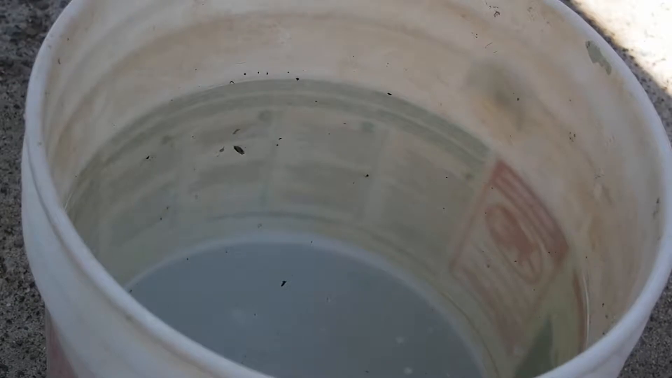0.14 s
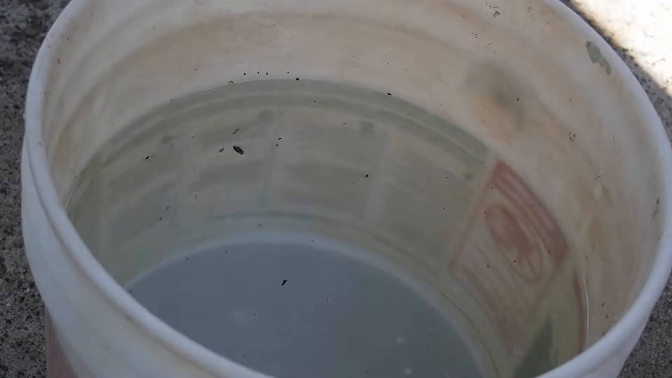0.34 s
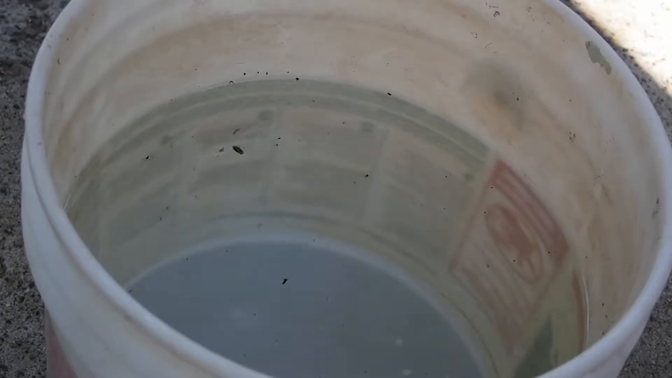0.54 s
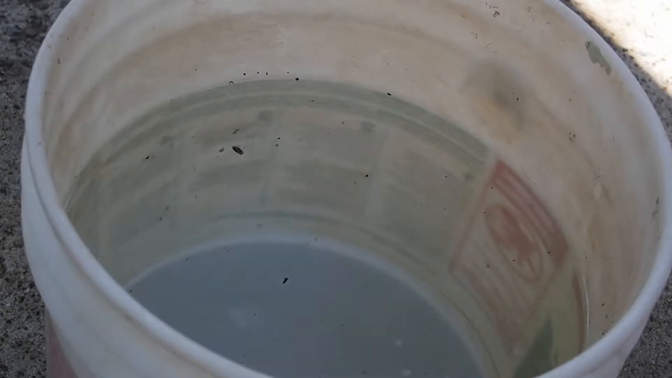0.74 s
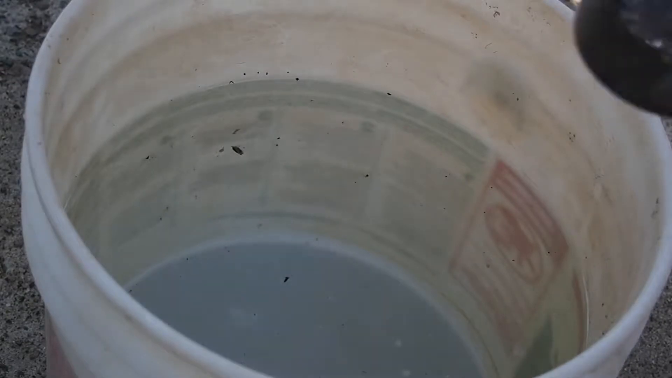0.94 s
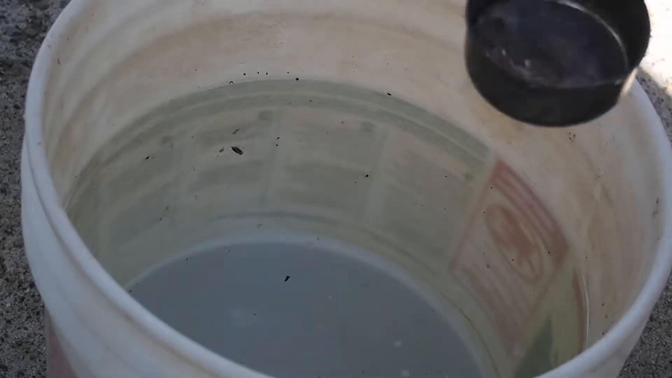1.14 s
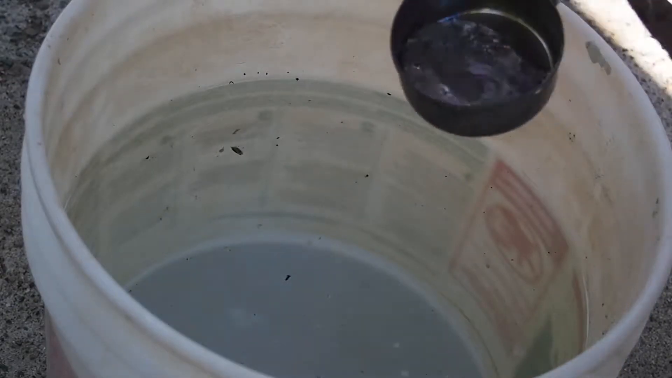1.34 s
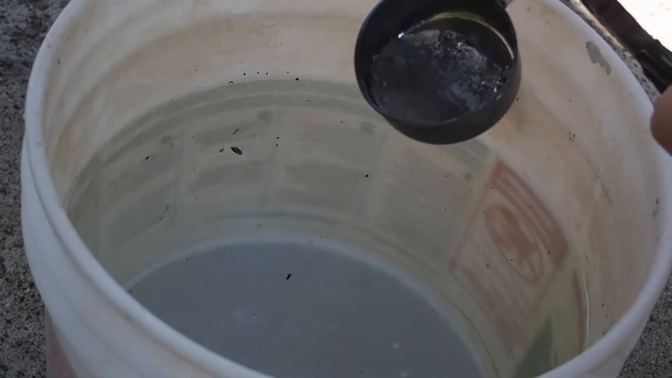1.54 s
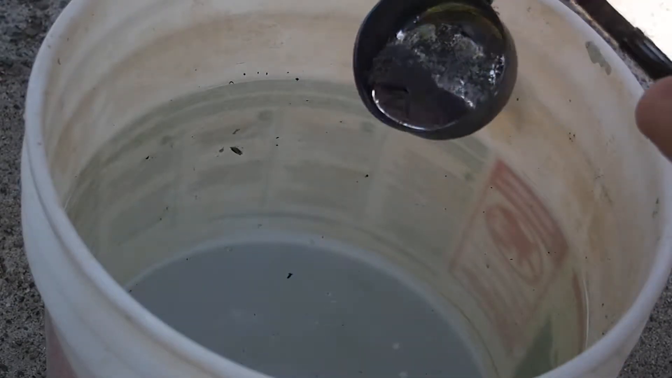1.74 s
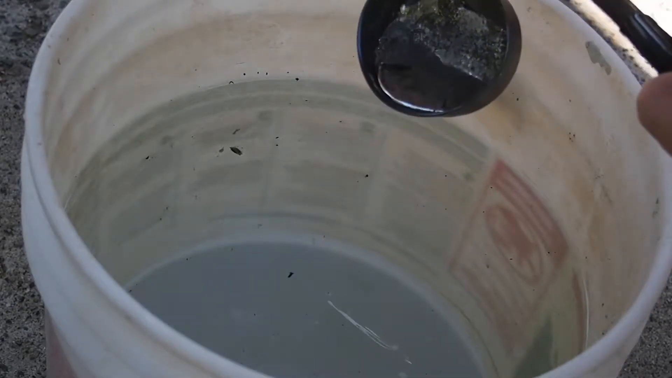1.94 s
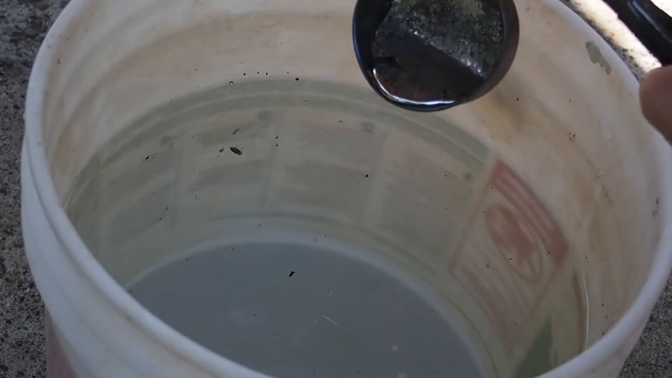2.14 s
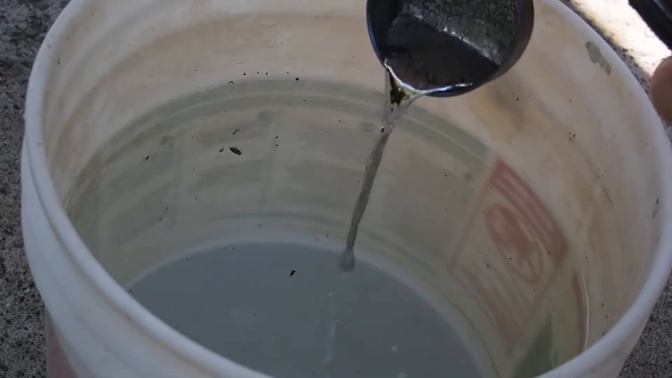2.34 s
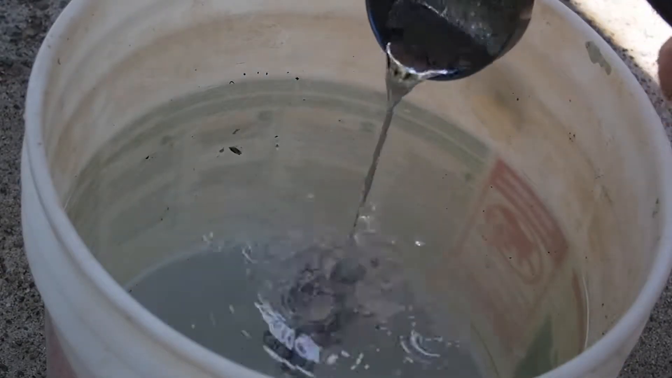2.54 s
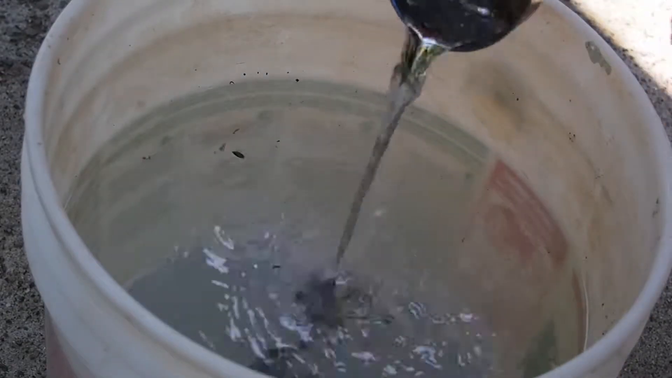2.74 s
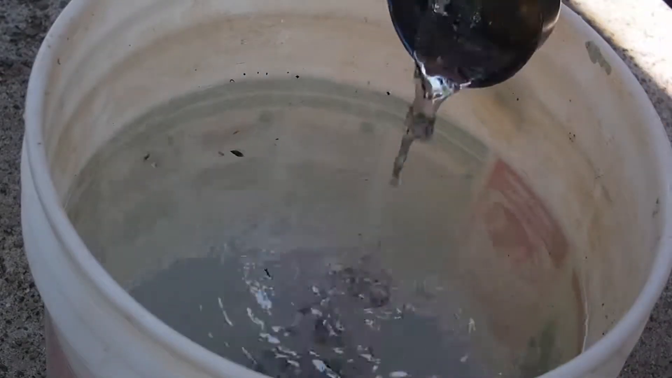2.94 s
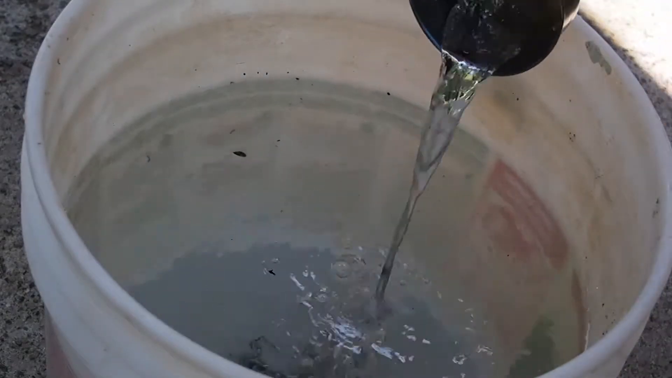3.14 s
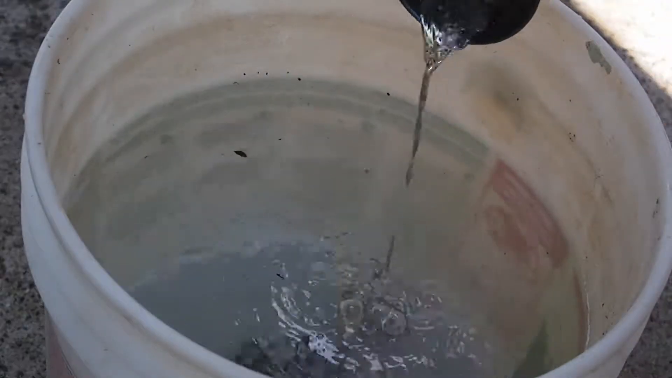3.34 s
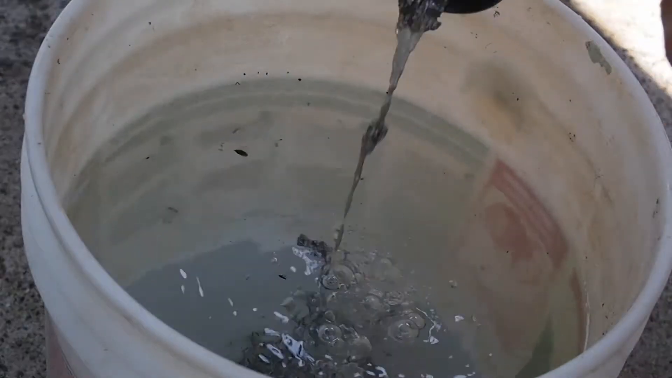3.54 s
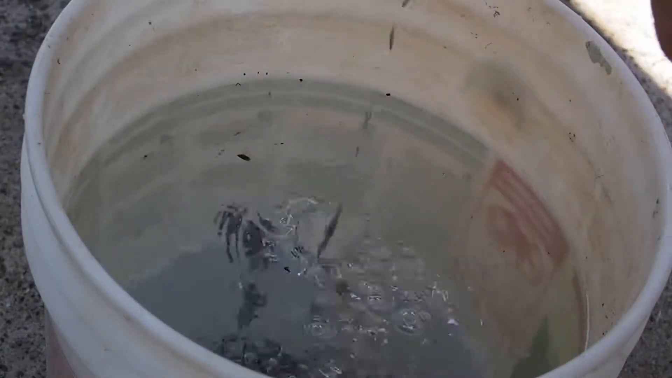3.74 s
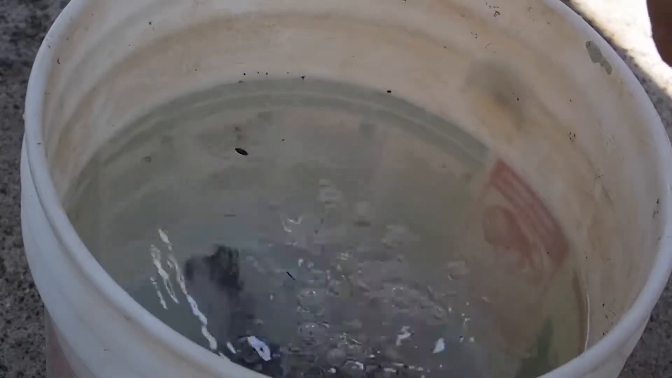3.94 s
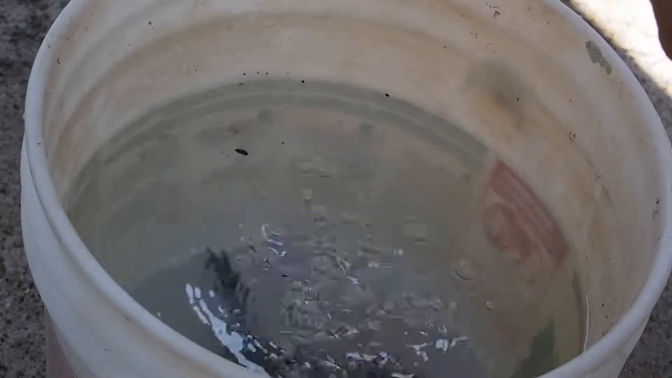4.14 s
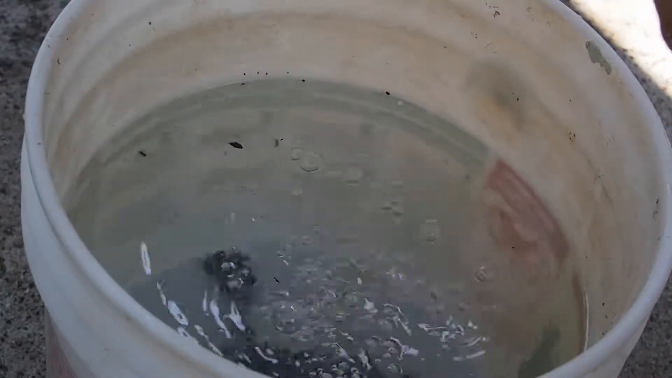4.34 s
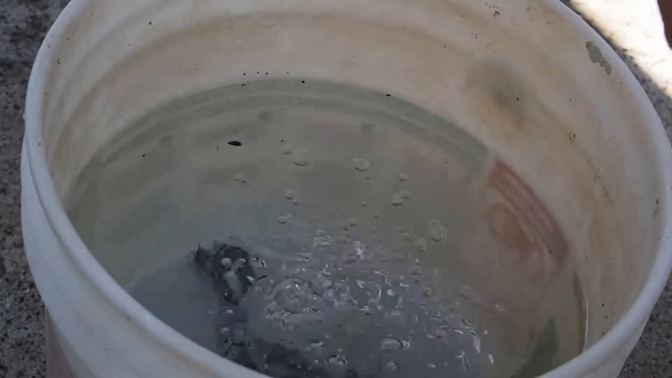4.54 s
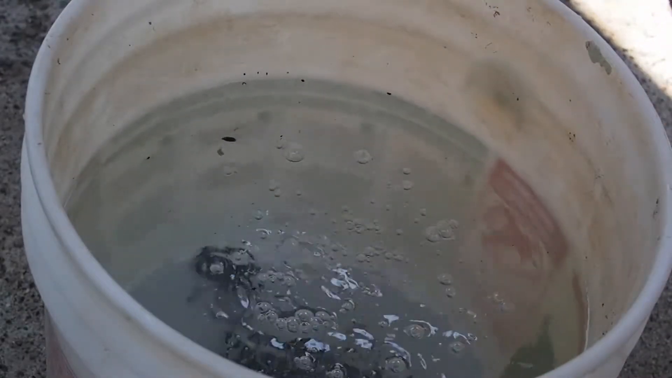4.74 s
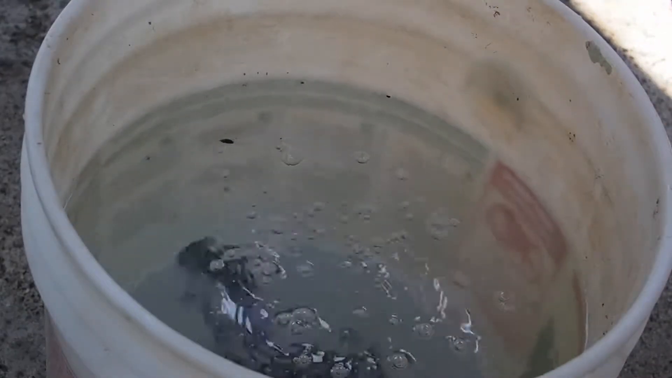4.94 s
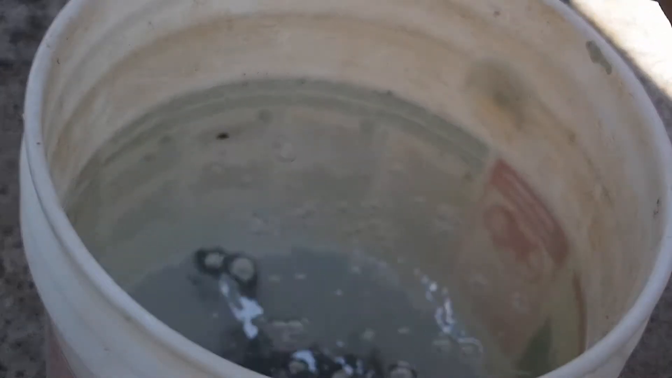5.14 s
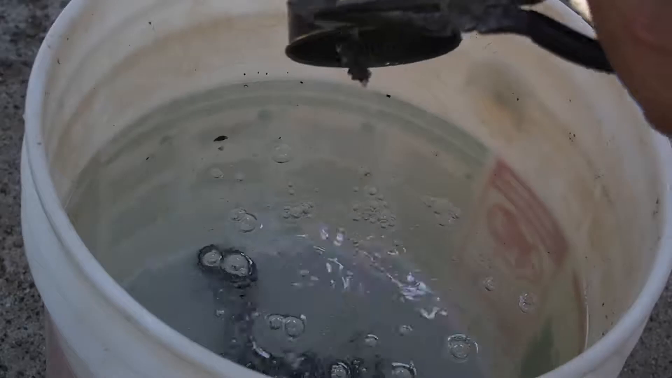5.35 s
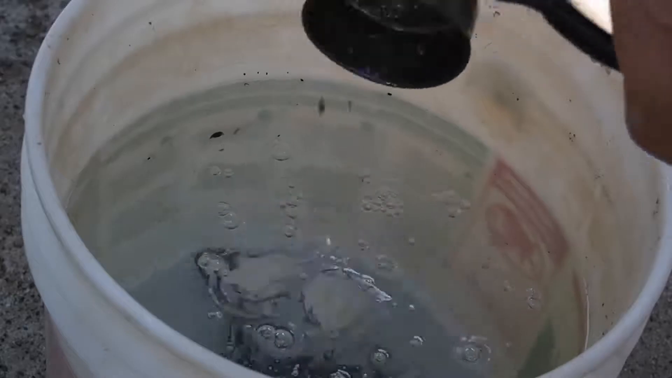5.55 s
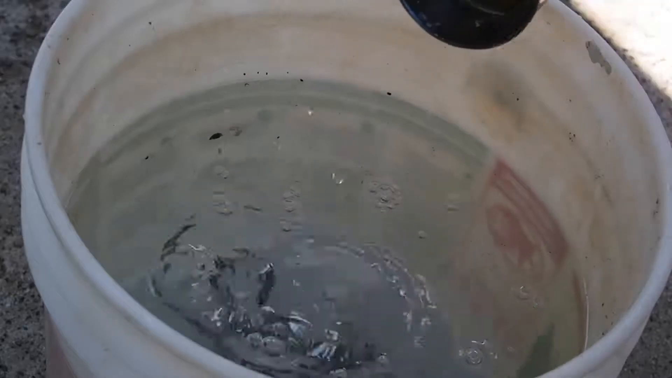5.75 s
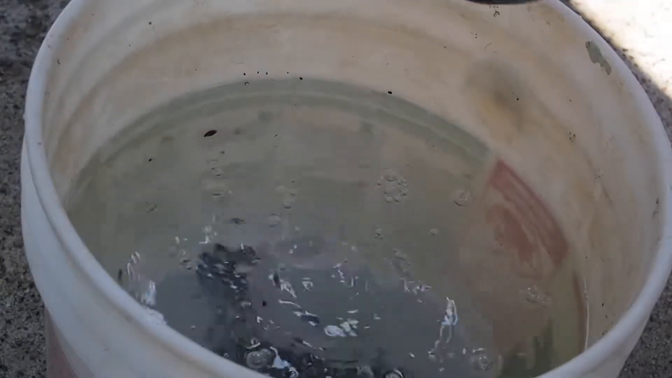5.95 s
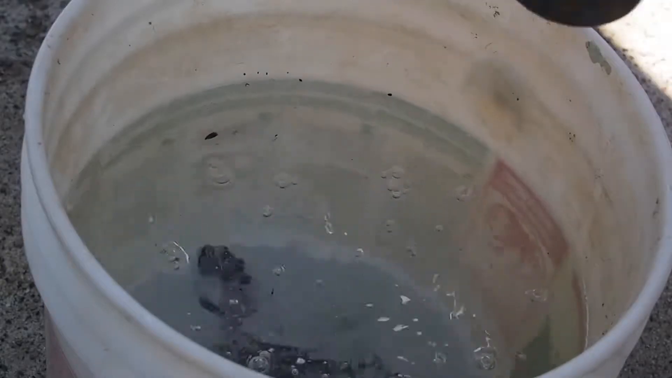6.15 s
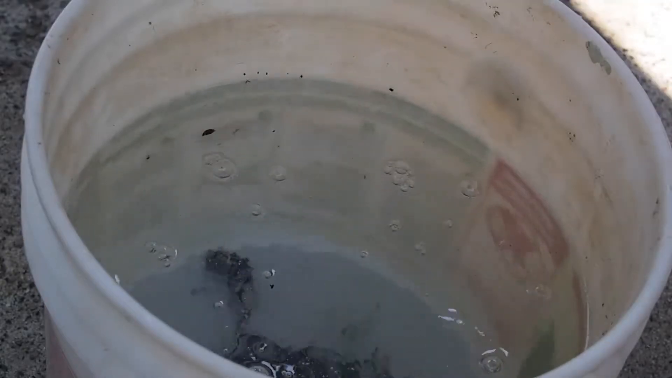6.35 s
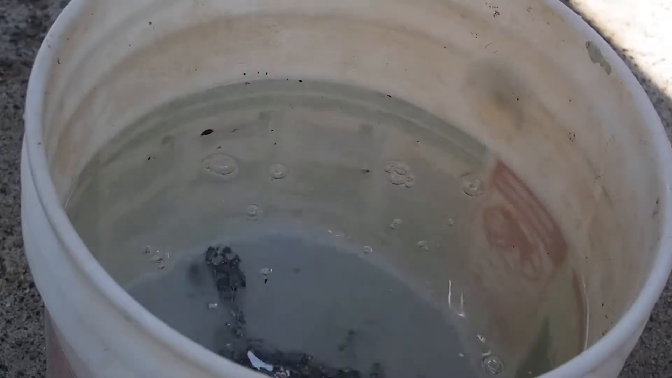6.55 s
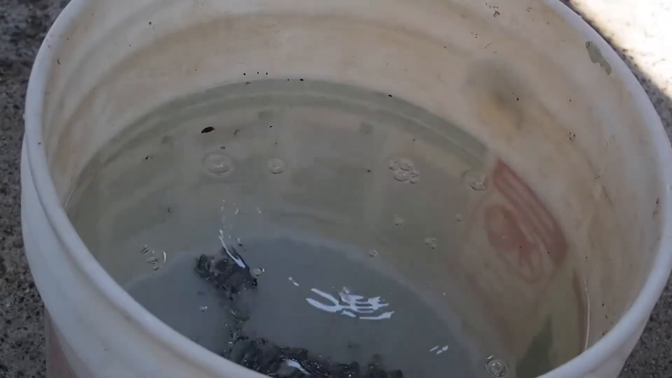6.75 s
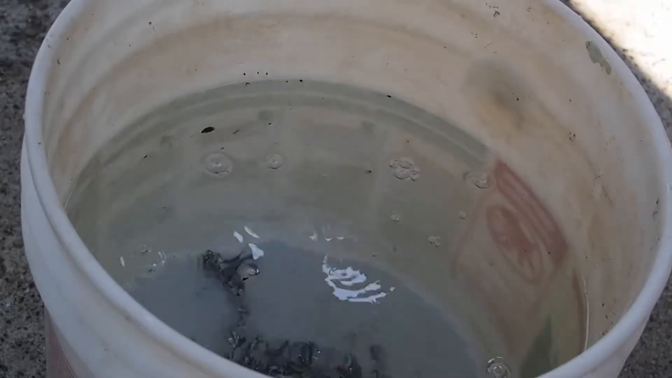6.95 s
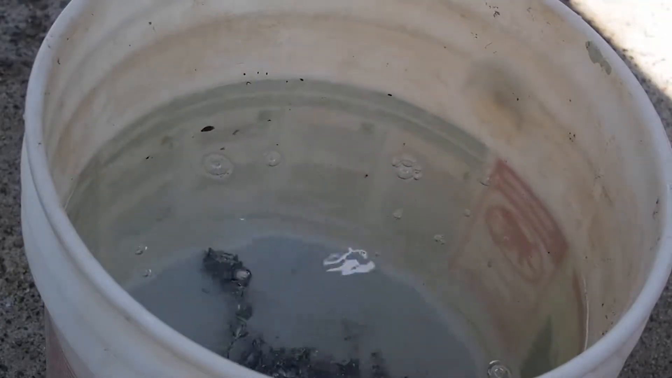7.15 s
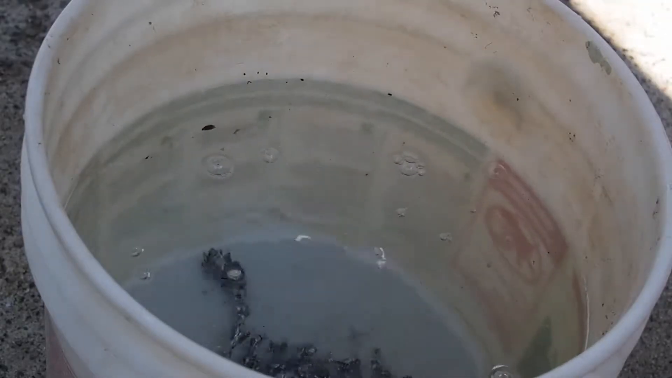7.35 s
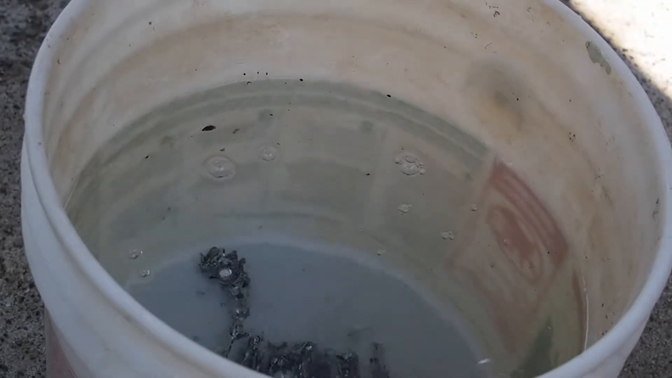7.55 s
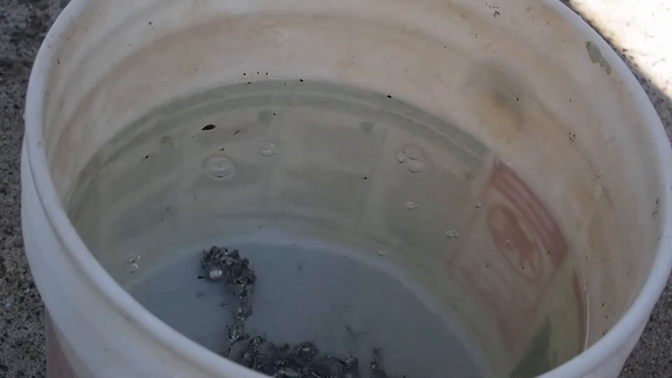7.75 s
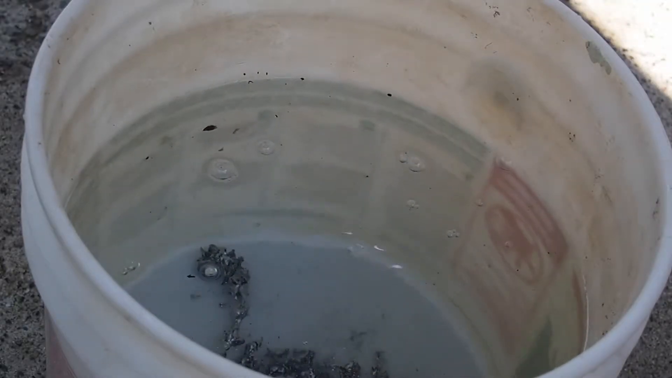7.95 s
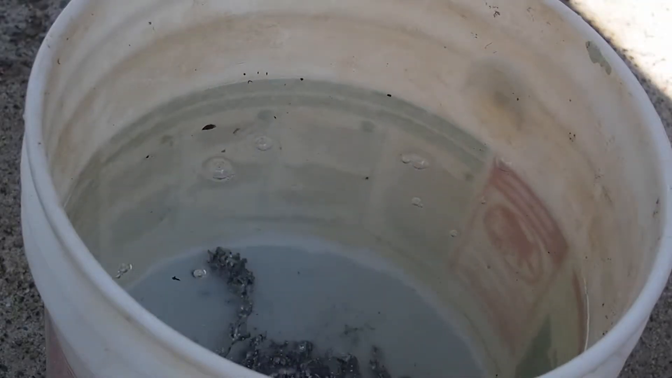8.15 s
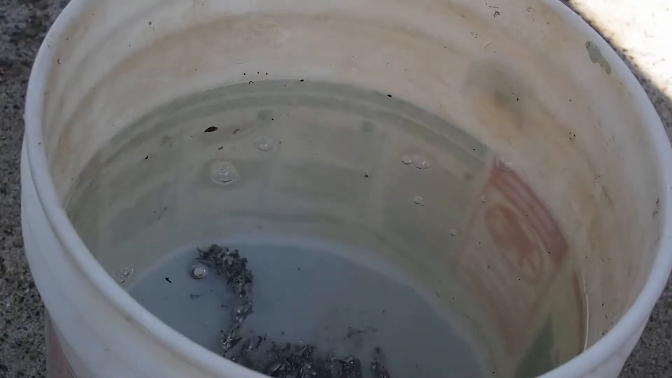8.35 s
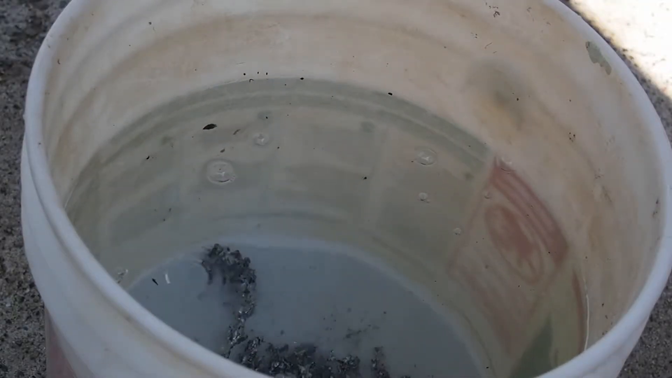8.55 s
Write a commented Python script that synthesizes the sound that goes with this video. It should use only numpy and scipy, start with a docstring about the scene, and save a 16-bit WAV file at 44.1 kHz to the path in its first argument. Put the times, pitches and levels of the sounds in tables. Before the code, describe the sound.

Sharp pops, crackles and sizzles of hot metal hitting water fade away before a metal cup is set down and rocks.

```python
"""Molten lead poured from a steel cup into a plastic bucket of water, close to a stereo pair, outdoors.
Steam pockets swell with a falling sizzle and collapse with sharp pops that push the recorder's gain down.
The cup is then set on concrete to the right, where it rings and rocks. Grit crunches under shoes and cup,
small birds whistle across the yard and a motor hums throughout."""
import sys
import numpy as np
from scipy import signal
from scipy.io import wavfile
from scipy.ndimage import uniform_filter1d

SR = 44100
rng = np.random.default_rng(int(sys.argv[2]) if len(sys.argv) > 2 else 0)


def int16_out(signal):
    """Quantize to a 16-bit WAV file."""
    q = np.round(np.clip(np.atleast_2d(signal).T, -1, 1) * 32767)
    wavfile.write(sys.argv[1], SR, q.astype(np.int16))


N = 383229
TIME = np.arange(N) / SR


def from_db(db):
    """Decibels to gain."""
    return 10 ** (np.asarray(db) / 20)


def rms_one(x):
    """Scale to rms 1."""
    return x / np.sqrt(np.mean(x ** 2) + 1e-20)


def add(out, s, sound):
    """Mix a sound in at s seconds."""
    i = int(s * SR)
    out[..., i:i + sound.shape[-1]] += sound[..., :N - i]


def stereo(mid, side, width=1):
    """Mid and side to left and right."""
    return mid + width * side * [[1], [-1]]


def filtered(x, hz, kind, order=2):
    """Butterworth filter."""
    sos = signal.butter(order, np.clip(hz, 10, .45 * SR), kind, fs=SR, output="sos")
    return signal.sosfilt(sos, x + 1e-18)


def drift(rate_hz):
    """A random wander of rms 1."""
    knots = rng.standard_normal(int(2 * rate_hz * N / SR) + 2)
    return rms_one(np.interp(TIME * 2 * rate_hz, np.arange(len(knots)), knots))


def envelope(s, attack_s, hold_s, fade_s):
    """A straight rise, a hold counted from the start, then an exponential fade."""
    age = TIME - s
    return np.clip(age / attack_s, 0, 1) * np.exp(-np.clip((age - hold_s) / fade_s, 0, 40))


def resonance(x, hz, width_hz):
    """A resonance with gain 1 at its peak."""
    r, w = np.exp(-np.pi * width_hz / SR), 2 * np.pi * hz / SR
    return signal.lfilter(np.array([1, 0, -1]) * (1 - r * r) / 2, [1, -2 * r * np.cos(w), r * r], x + 1e-18)


def ring(x, hz, t60):
    """A unit click sets a sine of height 1 ringing."""
    r, w = np.exp(-np.log(1000) / (t60 * SR)), 2 * np.pi * hz / SR
    return signal.lfilter([0, np.sin(w)], [1, -2 * r * np.cos(w), r * r], x + 1e-18)


def grains(per_s, spread_db):
    """Random clicks of uneven size."""
    sizes = from_db(spread_db * np.minimum(rng.exponential(1, N), 4)) * rng.choice([-1, 1], N)
    return rms_one(sizes * (rng.random(N) < per_s / SR))


def coloured(spectrum, sources, flicker_db):
    """Shape two (mid, side) pairs, taken in turn, into flickering third-octave bands."""
    # How alike the two microphones sound. Each row: frequency in Hz, likeness from 0 to 1.
    likeness = [(100, 0.98), (1000, 0.96), (3000, 0.53), (7000, 0.067), (15000, 0.18)]
    out, edges = 0, 31.25 * 2 ** np.arange(0, 9.1, 1 / 3)
    curves = np.transpose(spectrum), np.transpose(likeness)
    for k, (low, high) in enumerate(zip(edges, edges[1:])):
        log_centre = np.log(low * high) / 2
        band_db, alike = (np.interp(log_centre, np.log(hz), values) for hz, values in curves)
        if high > spectrum[0][0]:
            mid, side = filtered(sources[k % 2], [low, high], "band")
            band = stereo(np.sqrt(1 + alike) * mid, side, np.sqrt(1 - alike))
            out = out + from_db(band_db + flicker_db * drift(8)) * band
    return rms_one(out)


def scattered(x, t60, band_hz):
    """Dense reflections, alike at both microphones in the bass and unrelated in the treble."""
    t = np.arange(SR // 2) / SR
    mid, side = rng.standard_normal((2, len(t))) * np.exp(-np.log(1000) * t / t60) * (t > .001)
    tail = filtered(stereo(mid, filtered(side, 5700, "high", order=1)), band_hz, "band", order=1)
    return signal.fftconvolve(x[None], tail / np.sqrt(np.sum(tail ** 2) / 2), axes=1)[:, :N]


def motor(waver=0.00305, throb_db=2.5):
    """A motor hums nearby; its pitch wavers and each partial throbs."""
    # The hum's partials. Each row: frequency in Hz, relative level in dB.
    partials = [(59.2, -50), (118.4, -55), (166.9, -50.5), (236.9, -51.5), (646.0, -63), (995.9, -59.5),
                (1287, -68), (1696, -59.5), (1755, -59.5)]
    out, turn = np.zeros(N), 2 * np.pi * np.cumsum(1 + waver * drift(2)) / SR
    for hz, db in partials:
        gain = np.sqrt(2) * from_db(db - 1 + throb_db * drift(4))
        out += gain * np.sin(hz * turn + rng.uniform(0, 2 * np.pi))
    return out


def yard_air(level_db=-40.5):
    """A steady rush of air all around the microphones."""
    # The yard's background. Each row: frequency in Hz, relative spectral density in dB.
    spectrum = [(18, -45), (30, -43), (48, -9), (85, -8.5), (173, -3.5), (237, -2.5), (420, -21),
                (518, -9.5), (1020, -10), (1720, -16), (2240, -19), (3230, -19), (4090, -26), (6370, -27),
                (15500, -37)]
    return from_db(level_db) * coloured(spectrum, rng.standard_normal((2, 2, N)), flicker_db=1.5)


def birds(waver=0.00604, rise_share=0.42, flutter_db=2.5, overtones_db=-25, wet_db=-5):
    """Thin, wavering whistles from across the yard; each slides up and then holds its pitch."""
    # Each row: start and length in seconds, relative level in dB, first and last pitch in Hz.
    whistles = [(0.013, .12, -40.5, 5300, 5540), (1.551, .21, -44, 7830, 8020),
                (1.608, 0.12, -46.5, 7300, 7500), (1.773, 0.043, -52, 3130, 3460),
                (6.496, 0.2, -42.5, 5160, 5550)]
    out, wobble = np.zeros(N), 1 + waver * drift(60)
    for s, length, db, first_hz, last_hz in whistles:
        gain = np.sqrt(2) * from_db(db - 2) * envelope(s, attack_s=0.0047, hold_s=length, fade_s=0.013)
        hz = first_hz + (last_hz - first_hz) * np.clip((TIME - s) / (rise_share * length), 0, 1) ** 2
        turn = np.pi * np.cumsum(hz * wobble) / SR   # the whistle is the second harmonic of the voice
        out += gain * (np.sin(2 * turn) + from_db(overtones_db) * (np.sin(3 * turn) + np.sin(4 * turn)))
    out *= from_db(flutter_db * drift(35))
    return out + from_db(wet_db) * scattered(out, t60=0.34, band_hz=[2000, 10000])


def grit_scuffs(fade=0.82, bright_hz=5000):
    """Grit crunches under a sole or the rocking cup: a quick rise, then fading grains."""
    # Each row: start and length in seconds, level in dB, treble lift in dB.
    scuffs = [(0.601, 0.051, -49.5, 14.5), (1.559, 0.068, -45, 15), (6.77, 0.11, -35.5, -8),
              (6.915, 0.014, -22, -13), (6.928, 0.058, -33, 4.5), (8.108, 0.072, -39, -18),
              (8.263, 0.1, -39, 1.5), (8.424, 0.05, -37, -3), (8.472, 0.0097, -26.5, -23),
              (8.485, .11, -33.5, -2.5), (8.599, 0.055, -46.5, 13.5)]
    # The colour of the grit. Each row: frequency in Hz, relative spectral density in dB.
    spectrum = [(530, -38), (900, -7.5), (1430, 0), (1710, -4), (3030, 2), (3580, -5), (5240, -6),
                (14300, -19.5), (15500, -28)]
    crunch = np.array([[grains(3500, 6), grains(4900, 3)] for pair in range(2)])
    grit = coloured(spectrum, crunch, flicker_db=3.5)
    treble = filtered(grit, bright_hz, "high", order=1)
    out = np.zeros((2, N))
    for s, length, db, bright_db in scuffs:
        age = np.clip((TIME - s) / length, 0, 9)
        gain = from_db(db) * np.minimum(age * 9, 1) * np.exp(-fade * age ** 2)
        out += gain * (grit + (from_db(bright_db) - 1) * treble)
    return out


def rebounds(collapses, delay_s=0.006, weaker_db=-11.5):
    """Each collapsed pocket springs back and collapses once more, weakly."""
    chance = rng.uniform(-1, 1, (len(collapses), 3))
    return [(s + delay_s * (1 + late / 2), db + weaker_db - soft / 2, thump_db, hz * 2 ** (sharp / 2))
            for (s, db, thump_db, hz), (late, soft, sharp) in zip(collapses, chance)]


def pops(lead_s=0.00205, swell_s=0.0004, crack_s=0.0017, spray_s=0.002, snap_s=0.00025,
         ring_cycles=1.41, thump_hz=560, thump_s=0.0022):
    """Steam pockets collapse: crackle and spray, a sharp pressure dip, a brief ring, a water thump."""
    # Each row: start in seconds, relative level in dB, thump offset in dB,
    # pitch in Hz at which the pop rings (bubble or bucket).
    collapses = [(2.353, 5.5, -36, 1760), (2.374, -1, -19, 1550), (2.407, -14, -33, 1530),
                 (2.424, -5.5, -20, 2300), (2.478, -1, -21, 573), (2.508, -3.5, -15, 1700),
                 (2.531, -4.5, -11.5, 920), (2.551, -10, -19, 1570), (2.587, -4, -19, 958),
                 (2.637, 3.5, -31, 2750), (2.677, -0.5, -24, 2490), (2.714, -2, -11.5, 530),
                 (2.751, -6, -5, 519), (2.789, -5.5, -16, 549), (2.811, -5, -13, 960),
                 (2.844, -4.5, -15, 684), (2.852, -3.5, -19, 950), (2.881, -6, -20, 972),
                 (2.906, -0.5, -20.5, 2870), (2.924, -4.5, -15.5, 990), (3.001, -5, -23, 1740),
                 (3.01, -4.5, -11.5, 560), (3.029, -4.5, -35, 1750), (3.079, -2, -28, 1720),
                 (3.114, -11, -26.5, 1690), (3.147, -3.5, -15, 1720), (3.182, -3.5, -32, 1780),
                 (3.209, -5.5, -21, 1580), (3.238, -1.5, -9, 563), (3.294, -5.5, -16.5, 1750),
                 (3.317, -3, -22, 1800), (3.397, 1, -50, 2870), (3.447, -2.5, -32, 2850),
                 (3.459, -2.5, -13.5, 958), (3.478, -7, -30, 1760), (3.498, -4.5, -3, 501),
                 (3.534, -2.5, -12, 900), (3.577, -4, -36, 2650), (3.592, -12.5, -29, 1780),
                 (3.643, -12, -17, 1730), (3.66, -1, -31, 1880), (3.76, -8, -13, 2890),
                 (3.77, -5.5, -23.5, 2640), (3.806, -3, -30, 2830), (3.868, -8.5, -13, 870),
                 (3.942, -29, -35, 2800), (3.96, -22.5, -38, 3090), (4.369, -10, -44, 853),
                 (5.686, -22, -24, 1580)]
    out, t = np.zeros((2, N)), np.arange(SR // 20) / SR - lead_s
    after = np.maximum(t, 0)
    swell = np.exp(np.minimum(t, 0) / swell_s)
    burst = swell * (np.exp(-after / crack_s) + from_db(-11) * np.exp(-after / spray_s))
    snap = -np.exp(-after / snap_s) * (t >= 0)
    for s, db, thump_db, hz in list(collapses) + rebounds(collapses):
        mid, side = filtered(rng.standard_normal((2, len(t))), [1300, 13000], "band", order=1)
        crack = from_db(0.83 * db - 7) * stereo(mid, side, 0.22) * burst
        ring_gain = from_db(4 * np.log2(hz / 1500))   # higher pitches ring harder
        ringing = ring_gain * np.sin(2 * np.pi * hz * after) * np.exp(-after * hz / ring_cycles)
        detune = from_db(rng.normal(0, 1.84))
        thump = np.sin(2 * np.pi * thump_hz * detune * after) * np.exp(-after / thump_s)
        add(out, s, crack + from_db(db - 6) * (snap + ringing) + from_db(db + thump_db + 4) * thump)
    return filtered(out, 385, "high", order=3)


def churn(start_s=2.36, pour_s=1.14, fizz_db=-35.5, gurgle_db=-36, clump_db=3):
    """As the metal runs in, tiny bubbles fizz in clumps on top and larger ones gurgle below, then fade."""
    fizz_gain = from_db(fizz_db) * envelope(start_s, attack_s=0.1, hold_s=pour_s, fade_s=0.42)
    gurgle_gain = from_db(gurgle_db) * envelope(start_s, attack_s=0.1, hold_s=pour_s, fade_s=0.72)
    spray = np.array([grains(12000, 1.5), grains(12000, 3)])
    mid, side = rms_one(filtered(spray, [1700, 11000], "band", order=1) * from_db(clump_db * drift(70)))
    pitches_hz = np.geomspace(460, 2000, 16)
    births, size = grains(450, 4.9), rng.integers(0, len(pitches_hz), N)
    gurgle = sum(ring(births * (size == k), hz, t60=14 / hz) for k, hz in enumerate(pitches_hz))
    return fizz_gain * stereo(mid, side, 0.5) + gurgle_gain * rms_one(gurgle)


def sizzles(newborn_ratio=3.1, width_hz=380, overtone=1.3, hiss_db=3, splash_db=-15, ring_s=0.022):
    """Boiling hiss rings in a steam pocket, falling in pitch as it grows; the water around it splashes."""
    # Each row: start and length in seconds, relative level in dB, full-grown pitch in Hz.
    pockets = [(2.391, 0.045, -31, 1515), (2.44, 0.041, -27, 2600), (2.544, .034, -40, 2990),
               (2.653, 0.034, -28, 3000), (2.695, .025, -21.5, 2400), (2.869, 0.027, -26, 2715),
               (3.061, 0.026, -26, 3540), (3.331, 0.03, -26, 4410), (3.417, 0.02, -30.5, 2750),
               (3.604, 0.046, -21, 2520), (3.689, .092, -22.5, 2133), (3.855, 0.027, -22.5, 3100),
               (3.941, 0.035, -15.5, 3320), (4.17, .039, -15.5, 2953), (5.511, 0.061, -21.5, 3074),
               (5.665, 0.023, -27, 4220)]
    out, t = np.zeros((2, N)), np.arange(SR // 8) / SR
    flutter = from_db(3 * drift(250))
    wobble = 1 + .07 * drift(130)
    for s, length, db, last_hz in pockets:
        young = np.linspace(1, 0, int(length * SR))
        hz = last_hz * (1 + (newborn_ratio - 1) * young ** 4) * wobble[int(s * SR):][:len(young)]
        turn = 2 * np.pi * np.cumsum(hz) / SR
        noise = rng.standard_normal((7, SR // 4))[:, :len(young)]
        narrow = rms_one(filtered(noise[:2], width_hz, "low"))
        wide = rms_one(filtered(noise[2:4], 2 * width_hz, "low"))
        lower = narrow[0] * np.cos(turn) + narrow[1] * np.sin(turn)
        upper = wide[0] * np.cos(overtone * turn) + wide[1] * np.sin(overtone * turn)
        # nothing rings below the full-grown pocket
        pocket = filtered(lower + from_db(-8) * upper, 0.91 * last_hz, "high", order=5)
        mid, side = rms_one(filtered(noise[4:6], 1.32 * last_hz, "high", order=3))
        hiss = from_db(hiss_db) * stereo(mid, side, 0.45)
        splash = from_db(splash_db) * rms_one(filtered(noise[6], [420, 1900], "band"))
        swell = from_db(db - 3.5 - 5 * young ** 3) * np.minimum(1, young * 12)
        add(out, s, swell * (pocket + hiss + splash))
        after_ring = np.sin(2 * np.pi * last_hz * t) * np.exp(-t / ring_s)
        add(out, s + length, from_db(db - 17) * after_ring)
    return out * flutter


def gulps(fade_s=0.0082, rise_per_s=3):
    """Large bubbles break loose and ring low, rising in pitch as they near the surface."""
    # Each row: start in seconds, relative level in dB, starting pitch in Hz.
    bubbles = [(2.432, -16, 567), (2.48, -17, 543), (2.717, -13.5, 493), (2.734, -18, 524),
               (2.752, -15, 504), (3.24, -12.5, 548), (3.262, -19, 466), (3.502, -16.5, 385),
               (3.509, -17.5, 570), (3.522, -13, 517), (3.775, -20.5, 460)]
    out, t = np.zeros(N), np.arange(SR // 10) / SR
    for s, db, hz in bubbles:
        turn = 2 * np.pi * hz * t * (1 + rise_per_s * t / 2)
        add(out, s, from_db(db) * np.sin(turn) * np.exp(-t / fade_s))
    return out


def bucket(x, walls_db=-9, yard_db=-14):
    """The bucket's air column rings, its walls throw sound back and the yard adds a faint tail."""
    # The air column's modes. Each row: frequency and width in Hz, relative level in dB.
    modes = [(489, 22, 0.5), (650, 200, 0.5), (958, 140, 6), (1133, 124, 3), (1574, 180, 9),
             (1750, 100, -2.5), (2534, 460, 2), (2926, 360, -2.5), (5430, 220, -9), (6160, 200, 6.5)]
    x = x + sum(from_db(db - 1) * resonance(x, hz, width) for hz, width, db in modes)
    mono = x.mean(axis=0)
    walls = from_db(walls_db) * scattered(mono, t60=0.073, band_hz=[467, 9100])
    tail = from_db(yard_db) * scattered(mono, t60=0.24, band_hz=[490, 12200])
    return x + walls + tail


def spit(start_s=4.101, gain_db=-1.4, fade_s=0.0018):
    """One tiny drop spits: a very short, very high tick of steam."""
    out, t = np.zeros((2, N)), np.arange(SR // 50) / SR
    mid, side = rms_one(resonance(rng.standard_normal((2, len(t))), hz=14800, width_hz=900))
    add(out, start_s, from_db(gain_db) * stereo(mid, side, 0.5) * np.exp(-t / fade_s))
    return out


def froth(start_s=4.21, attack_s=0.008, rush_db=-33, linger_db=-51):
    """Steam reaches the surface with a smooth hiss; the last bubbles linger and burst with tiny ticks."""
    hiss = rng.standard_normal((2, N))
    rush = rms_one(filtered(hiss, [2500, 8000], "band", order=1))
    ticks = rms_one(filtered(grains(200, 6.7) + from_db(-3) * hiss, [2800, 9000], "band", order=1))
    return (from_db(rush_db) * envelope(start_s, attack_s, 0, fade_s=0.07) * rush
            + from_db(linger_db) * envelope(start_s, attack_s, 0, fade_s=0.96) * ticks)


def cup(contact_hz=1600, softening=0.14, tick_db=-12, tick_s=0.0048, crush_db=-33.5, wet_db=-13):
    """The steel cup rocks on concrete; knocks and the rub of grit excite the same modes."""
    # The steel's modes. Each row: frequency in Hz, relative level in dB, seconds to fall 60 dB.
    modes = [(1130, -29, 0.33), (1252, -20.5, .33), (1321, -13, 0.11), (1335, -20, 0.27), (1354, -20, 0.16),
             (1490, -32, 0.37), (1720, -22, 0.11), (1974, -19.5, .13), (2270, -15.5, 0.065),
             (2600, -17.5, 0.047), (2910, -22, 0.13), (3060, -14, 0.14), (3100, -12, 0.14),
             (3660, -15, .046), (4080, -6, 0.046), (4250, -10, 0.037), (6580, -10, 0.048), (7500, -9, .03),
             (11400, -16, .015), (14300, -20, 0.01)]
    # The cup touching down. Each row: time in seconds, strength in dB.
    knocks = [(7.146, 5.5), (7.24, -2), (7.262, -10.5), (7.301, -10), (7.326, -15), (7.421, -16),
              (7.436, -15), (7.799, -24.5), (7.972, -29), (8.126, -25), (8.409, -33)]
    # The cup sliding over grit. Each row: start and fade time in seconds, strength in dB.
    skids = [(7.155, 0.067, -17), (7.227, 0.0089, -25), (7.306, 0.017, -39), (7.408, 0.022, -23),
             (7.431, 0.049, -19.5), (7.688, 0.039, -35), (7.8, 0.034, -36), (8.118, .025, -45)]
    knock_s, knock_db = np.transpose(knocks)
    at = (knock_s * SR).astype(int)
    dull_hz = contact_hz * from_db(-softening * knock_db)   # heavy knocks stay longer in contact
    drag = sum(from_db(db) * envelope(s, 0.0031, 0, fade_s) for s, fade_s, db in skids)
    rub = drag * grains(5000, 3.9) * from_db(3 * drift(45))
    rub_force = from_db(5) * rub / np.sqrt(SR / 100)
    out, t = np.zeros(N), np.arange(SR // 20) / SR
    for hz, db, t60 in modes:
        clicks = np.zeros(N)
        clicks[at] = from_db(knock_db + rng.normal(0, 2, len(at))) / np.hypot(1, (hz / dull_hz) ** 2)
        rattle = from_db(3.5 * drift(35))   # the shifting contact damps each mode unevenly
        out += from_db(db) * rattle * ring(clicks + rub_force, hz, t60)
    for s, db in knocks:
        tick = filtered(rng.standard_normal(len(t)), [1000, 4000], "band") * np.exp(-t / tick_s)
        add(out, s, from_db(db + tick_db) * tick)
    crushed = np.minimum(drag / from_db(crush_db), 1)   # grit only cracks under enough pressure
    grit = from_db(0.5) * crushed * filtered(rub, [3000, 13000], "band", order=1)
    out = filtered(out + grit, 1060, "high")
    return out + from_db(wet_db) * scattered(out, t60=0.92, band_hz=[695, 7600])


def from_right(x, lag_samples):
    """Sound from the right reaches the left microphone a little later."""
    return np.array([np.interp(np.arange(N) - lag_samples, np.arange(N), x[0]), x[1]])


def scene():
    """The bucket in front, cup and scuffs to the right, the yard all around."""
    # Violence of the boiling as the metal cools. Each row: time in seconds, relative level in dB.
    boiling = [(2.35, 11.5), (2.39, 15.5), (2.8, 18), (3.25, 11.5), (3.55, 8), (3.8, 6), (4.1, -8),
               (5.5, 2.5)]
    violence = from_db(np.interp(TIME, *np.transpose(boiling)) - 2)
    pour = bucket(violence * (pops() + gulps() + sizzles() + spit() + churn()) + froth())
    return pour + from_right(cup() + grit_scuffs(), lag_samples=2.6) + birds() + motor() + yard_air()


def record(dry, limit_db=-12, release_db_per_s=17, attack_s=0.00087, tilt_db=1.23, cutoff_hz=15900):
    """The recorder's gain drops just after each loud pop and creeps back; peaks clip, the top is cut."""
    left = np.convolve(dry[0], [.1, .8, .1], "same")   # the left side is duller, and weaker too
    x = np.array([left * from_db(-tilt_db), dry[1] * from_db(tilt_db)])
    power = uniform_filter1d(np.mean(x ** 2, axis=0), size=130)
    over_db = np.maximum(10 * np.log10(np.maximum(power, 1e-12)) - limit_db, 0)
    held_db = np.maximum.accumulate(over_db + release_db_per_s * TIME) - release_db_per_s * TIME
    pole = np.exp(-1 / (attack_s * SR))
    reduction_db = signal.lfilter([1 - pole], [1, -pole], held_db)
    x = np.clip(x * from_db(-reduction_db), -1, 1)
    return signal.sosfilt(signal.ellip(10, .2, 80, cutoff_hz, fs=SR, output="sos"), x)


dry = scene()
out = record(dry)
int16_out(out)
```